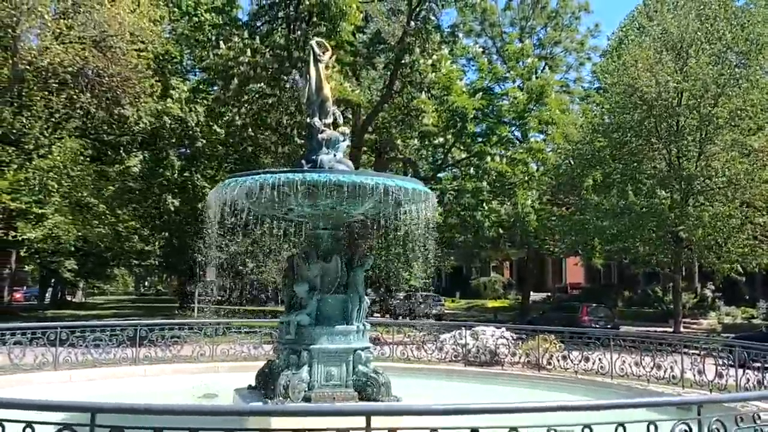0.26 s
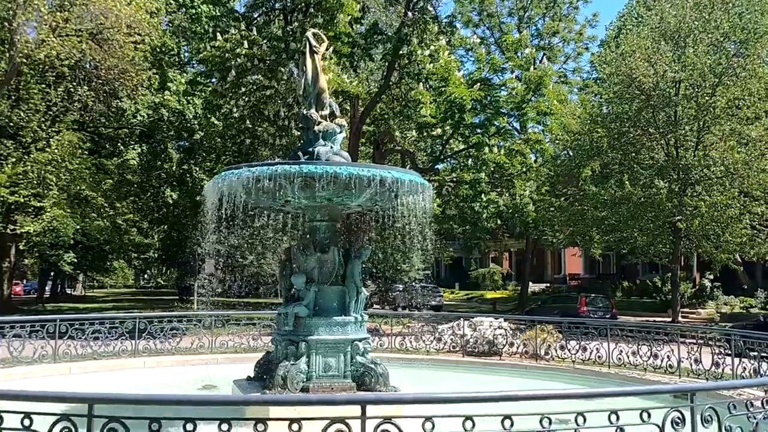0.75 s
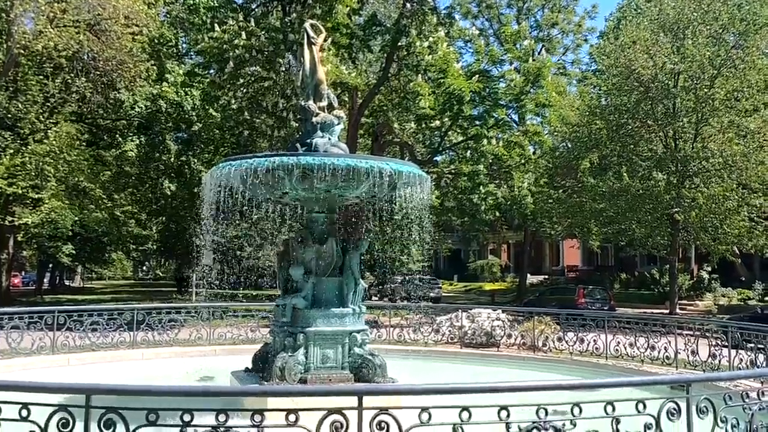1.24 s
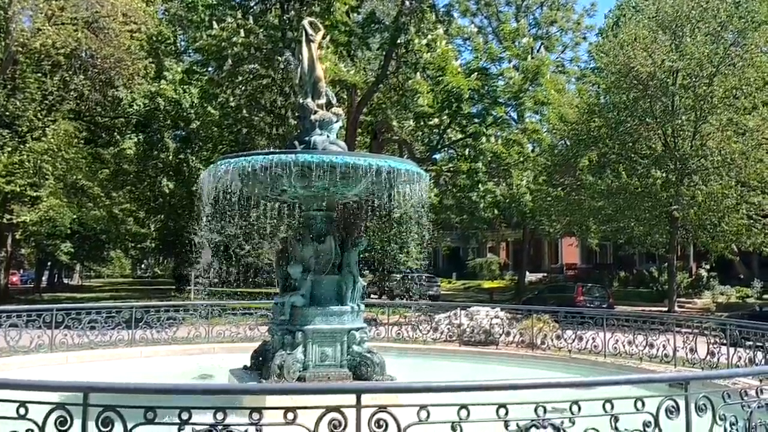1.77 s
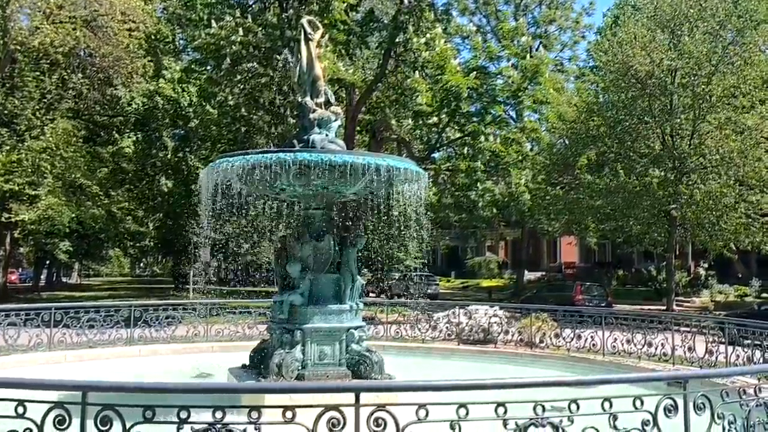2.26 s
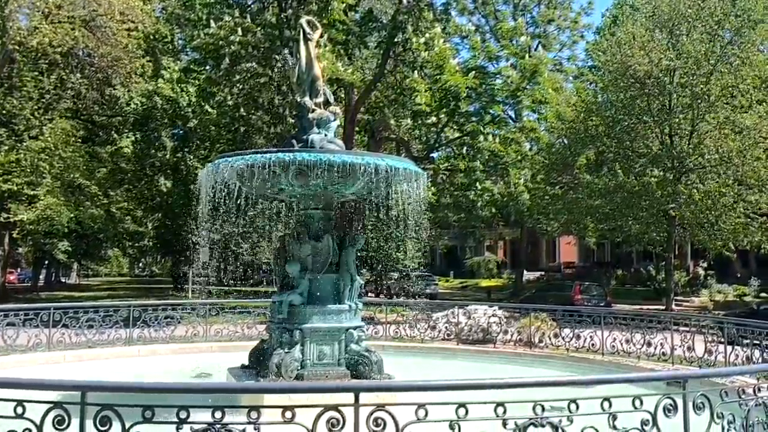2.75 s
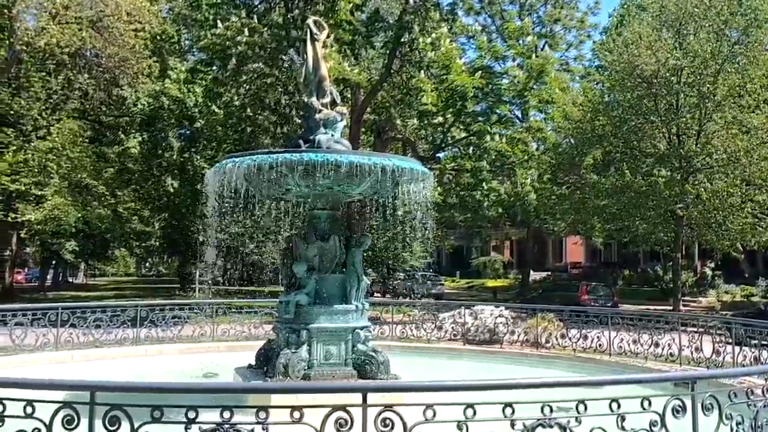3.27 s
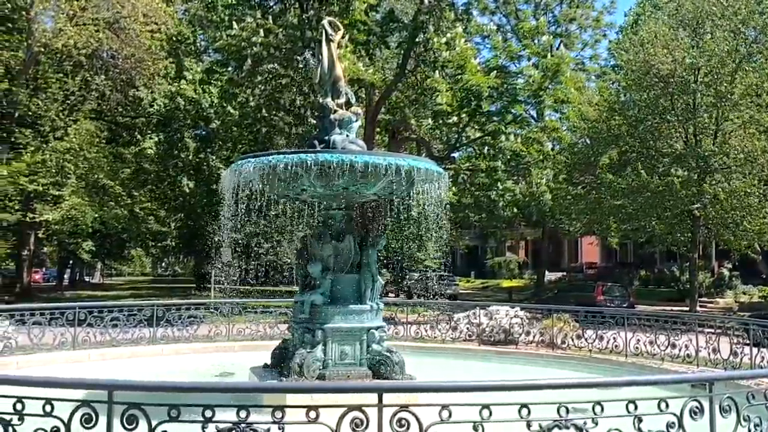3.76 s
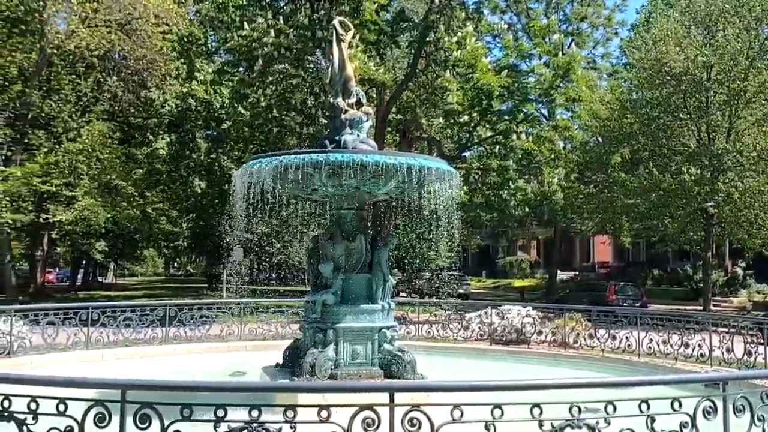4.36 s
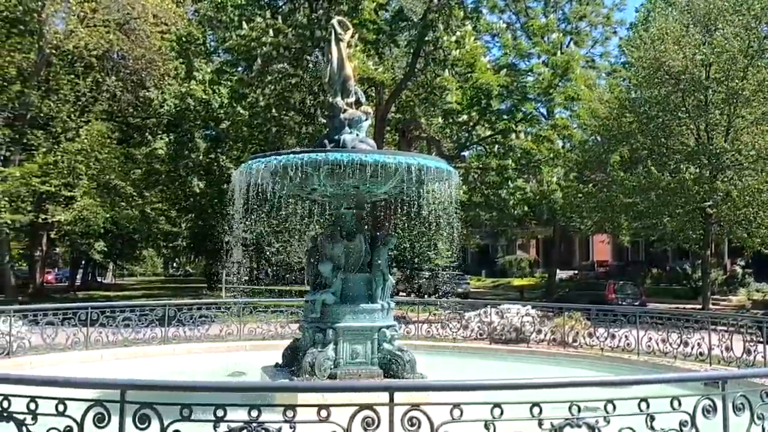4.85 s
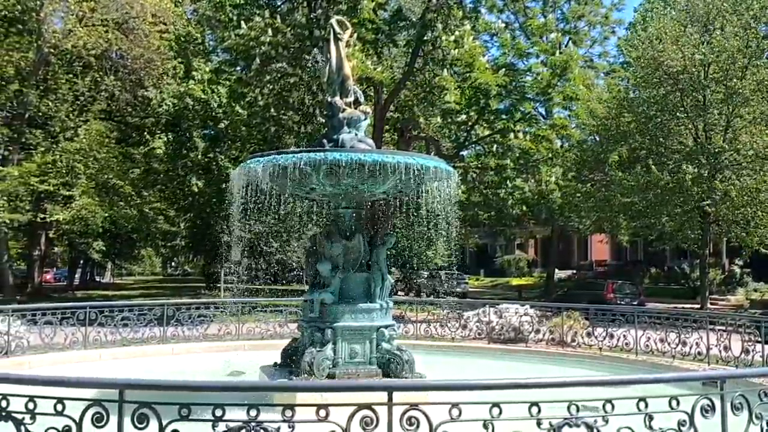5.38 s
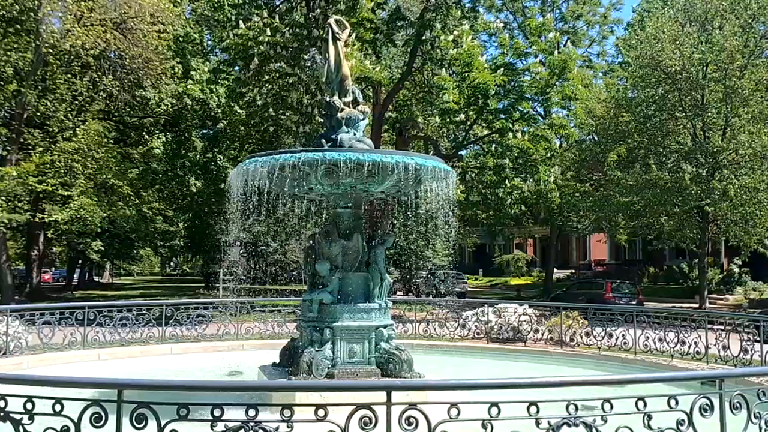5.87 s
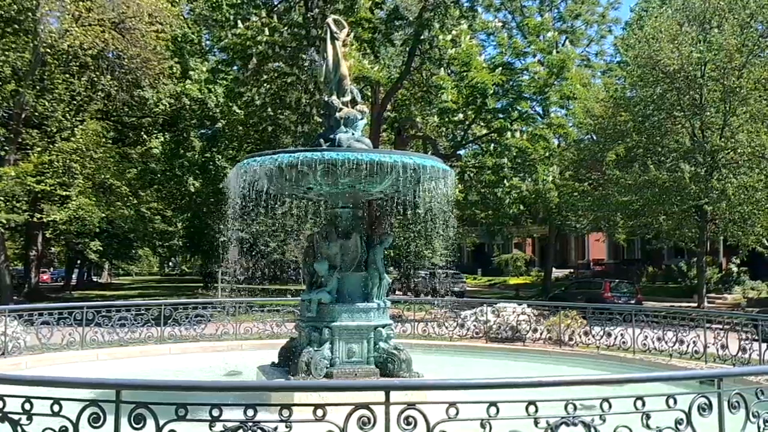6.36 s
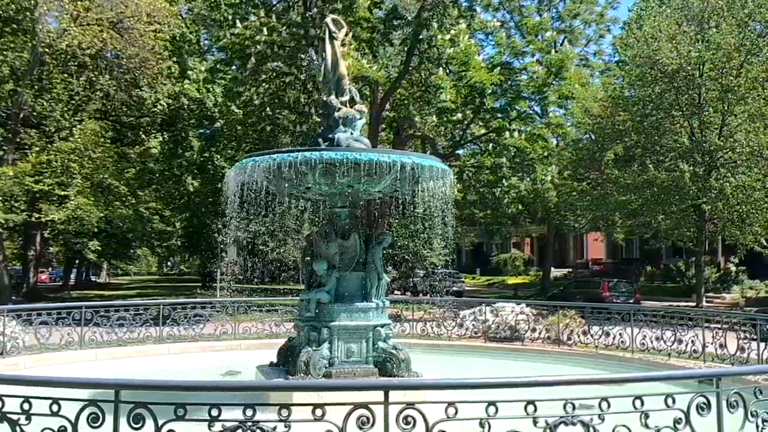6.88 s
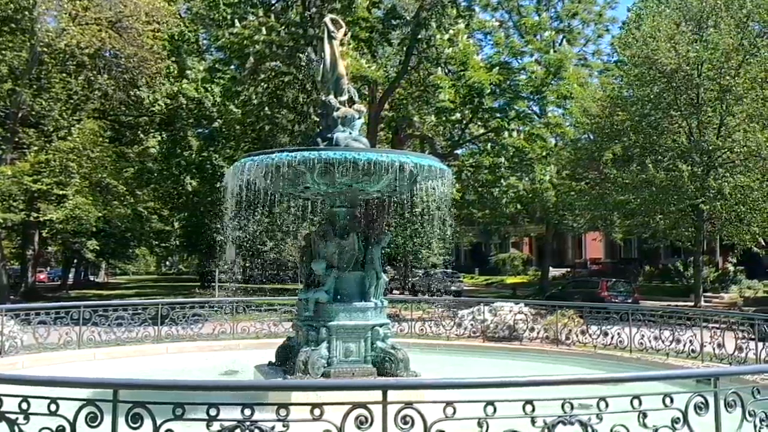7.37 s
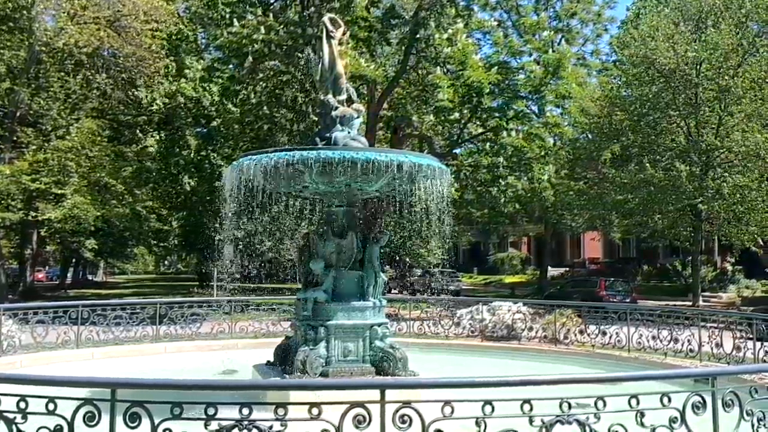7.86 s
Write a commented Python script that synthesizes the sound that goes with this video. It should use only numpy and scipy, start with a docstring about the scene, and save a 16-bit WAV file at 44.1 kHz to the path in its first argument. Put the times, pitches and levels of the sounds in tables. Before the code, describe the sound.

A steady curtain of water falls from a fountain bowl into a shallow pool outdoors, heard from a few metres away in stereo. It runs throughout as quick bubbly patter with a bright fizz of droplets, uneven runs of deeper plops and clear ringing plinks, the strongest near 5.1 s; splashes are sparser from about 6.7 to 8 s. Small dry ticks sound close by at 0.05, 0.2 and 0.9 s. A low, wavering distant engine hum makes one long swell from about 1.7 to 3.3 s, with fainter ones elsewhere over soft rumble and wash. Low wind bumps touch the microphone near 3.0 and 3.2 s. A thin raspy hiss on the left grows, climbing and widening from 3.8 to 4.5 s, then holds until the end at 8.1 s, spitting near 7.1 s. Very faint hoarse hoots fall in pitch far away near 3.8, 7.4 and 7.7 s.

```python
"""Outdoors, a curtain of water falls from a fountain's bowl into its pool. Bubbles make a steady patter and
droplet ticks a fizz; thick strands plop, clumps splash as big ringing bubbles and gusts of spray sweep by.
A distant engine's wavering tone hums in swells, one of them long, over rumble, a low wash and a faint breeze.
A rasping noise band hisses on the left, grows louder and higher halfway through and then stays.
A few dry ticks and thumps sound close by, and far-off wavering tones hoot and fall in pitch."""
import sys
import numpy as np
from scipy import signal
from scipy.fft import rfft, irfft, next_fast_len
from scipy.io import wavfile
from scipy.ndimage import uniform_filter1d

SR = 44100
rng = np.random.default_rng(int(sys.argv[2]) if len(sys.argv) > 2 else 0)


def bounce(signal):
    """Save signal as a 16-bit WAV file at the path given by the first command-line argument."""
    frames = np.transpose(np.atleast_2d(signal))
    limited = np.clip(frames, -1, 1)
    pcm = np.round(limited * 32767).astype(np.int16)
    wavfile.write(sys.argv[1], SR, pcm)


N = 358515
TIME = np.arange(N) / SR

# Clumps of water that splash. Each row: start in seconds, relative level of the big bubble in dB, its pitch in Hz,
# relative level of its shower of drops in dB, left-right difference of the big bubble in dB (positive is left).
SPLASHES = [(.03, -36, 1960, -41, 0), (0.226, -31, 1200, -40, 2), (.2995, -16, 2560, -41, -1),
            (.45, -29, 2670, -36, 0), (.6698, -24, 1990, -40, 0), (.691, -25, 690, -53, 0),
            (0.729, -15.5, 1480, -47, 7), (0.8953, -15.5, 1340, -48, 0), (0.921, -13, 1380, -44, 0),
            (1.01, -28, 2040, -34, 0), (1.31, -25, 2060, -38, 0), (1.5984, -22, 1890, -36, -4),
            (1.7267, -12, 2480, -42, 4), (1.758, -23, 2630, -41, 0), (1.8393, -21, 1370, -35.5, 0),
            (1.896, -16, 2600, -38, 0), (2.249, -18, 1370, -35.5, 2), (2.451, -21, 1310, -38, 0),
            (2.564, -16, 2550, -43, 2), (2.813, -24, 697, -50, 0), (2.9853, -18, 1350, -51, -1),
            (3.112, -22, 2110, -45, 0), (3.1475, -15, 2070, -39, 3), (3.35, -18, 1310, -43, -2),
            (3.529, -17, 1260, -46, 0), (3.565, -25, 1290, -51, 0), (3.9266, -16, 1220, -45, 0),
            (3.936, -23, 930, -45, 2), (4.11, -27, 1340, -38, 0), (4.3632, -12, 2060, -41, 2),
            (4.375, -26, 2660, -32, 0), (4.385, -19, 1370, -34, 0), (4.555, -18, 1370, -38, 0),
            (4.598, -16, 1440, -41, -1), (4.702, -17, 2050, -51, -1), (4.775, -20.5, 687, -59, 0),
            (4.989, -24, 1330, -36, -2), (5.01, -28, 2650, -39, 0), (5.029, -18.5, 826, -54, 0),
            (5.075, -7.5, 2020, -31.5, 0), (5.17, -25, 2000, -40, 0), (5.291, -16.5, 1246, -46, -2),
            (5.4636, -21, 1840, -40, 1), (5.52, -25, 1320, -44, 0), (5.6752, -16, 1220, -40, 5),
            (5.746, -21, 1350, -43, -1), (5.93, -16, 2860, -33, 0), (6.4555, -15.5, 1290, -45, 1),
            (6.503, -23, 2060, -38, 0), (6.6684, -14.5, 1310, -39, 0), (6.7195, -16.5, 1194, -62, 0),
            (7.70, -29, 1300, -35, 0), (7.72, -30, 2020, -36.5, 0), (8.043, -18.5, 1430, -41, 0),
            (8.05, -30, 2470, -31, 0)]
# Spectrum of the low rumble and of the breeze. Each row: frequency in Hz, relative level in dB.
RUMBLE_COLOUR = [(20, -27), (45, -11), (70, -6), (95, 3), (130, -3.5), (180, -3.5), (230, -11), (400, -52)]


def amp(db):
    """Decibels to gain."""
    return 10 ** (np.asarray(db) / 20)


def unit(x):
    """Scales to rms 1."""
    return x / np.sqrt(np.mean(x ** 2) + 1e-20)


def read(points, hz):
    """A spectrum's value on a log-frequency axis."""
    f, value = np.transpose(points)
    return np.interp(np.log(hz + 1e-6), np.log(f), value)


def curves(rows, t=TIME):
    """Each column of a table as a curve in time."""
    s, *columns = np.transpose(rows)
    return [np.interp(t, s, c) for c in columns]


def add(mix, s, sound):
    """Mixes a stereo sound in at time s, in seconds."""
    part = mix[:, max(round(s * SR), 0):][:, :sound.shape[1]]
    part += sound[:, :part.shape[1]]


def pan(side_db):
    """Left and right gains for a level difference; positive leans left."""
    return amp(np.array([[.5], [-.5]]) * side_db)


def colour(x, points):
    """Filters by a spectrum and scales to rms 1."""
    size = next_fast_len(N + 4096)
    gain = amp(read(points, np.fft.rfftfreq(size, 1 / SR)))
    return unit(irfft(rfft(x, size) * gain, size)[:, :N])


def diffuse(pair):
    """Sound from all around: alike in both channels in the bass, unrelated in the treble."""
    # Likeness of the two channels. Each row: frequency in Hz, left-right likeness from 0 to 1.
    likeness = [(60, 0.95), (170, 0.92), (740, 1), (1300, 0.87), (2000, 1), (3300, 0.41), (5500, 0)]
    size = next_fast_len(pair.shape[1])
    a, b = rfft(pair, size)
    same = np.clip(read(likeness, np.fft.rfftfreq(size, 1 / SR)), 0, 1)
    right = same * a + np.sqrt(1 - same ** 2) * b
    return irfft(np.array([a, right]), size)[:, :pair.shape[1]]


def wander(per_s):
    """A random curve of rms 1, drawn in straight lines between per_s random points a second."""
    knots = rng.standard_normal(20000)
    return unit(np.interp(TIME * per_s, np.arange(len(knots)), knots))


def steady(x, size=3000):
    """Keeps the fast grain of a sound and evens out its slow level; size is the averaging span in samples."""
    power = uniform_filter1d(uniform_filter1d((x ** 2).mean(0), size), size)
    return x / np.sqrt(abs(power) + 1e-9)


def patchy(x, depth_db, frames, bins):
    """Narrow bands of a sound brighten and dim at random for a moment."""
    z = signal.stft(x, SR, nperseg=512, noverlap=256)[2]
    smooth_in_time = uniform_filter1d(rng.standard_normal(z.shape), frames, 2)
    patches = unit(uniform_filter1d(smooth_in_time, bins, 1))
    return signal.istft(z * amp(depth_db * patches), SR, nperseg=512, noverlap=256)[1][:, :N]


def tone(hz, db, waver, per_s=25):
    """A sine of rms level db whose pitch wavers by the fraction waver (rms)."""
    phase = 2 * np.pi * np.cumsum(hz * (1 + waver * wander(per_s))) / SR
    return amp(db) * np.sqrt(2) * np.sin(phase)


def scatter(x, wet_db, t60):
    """Scattered echoes from stone, water and trees, changing as the paths shift; t60 is in seconds."""
    t, out = np.arange(SR // 3) / SR, x.copy()
    for k in range(3):
        tail = diffuse(rng.standard_normal((2, len(t)))) * amp(-60 * t / t60) * (t > .003)
        tail = tail / np.linalg.norm(tail[0])
        # three noise tails take turns, 2.3 cycles per second
        share = np.sqrt(2 / 3) * np.cos(2 * np.pi * (2.3 * TIME + k / 3))
        out += amp(wet_db) * signal.oaconvolve(x * share, tail, axes=1)[:, :N]
    return out


def reflect(x):
    """The pedestal's early echo ripples the spectrum, slightly differently at each ear."""
    # The echo off the pedestal: delay in seconds, gain.
    echo = (.00146, 0.28)
    delay_s, gain = echo
    out = x.copy()
    add(out, delay_s, gain * np.array([x[0], np.roll(x[1], 1)]))
    return out


def placed(x):
    """Tilts each frequency of the water to the left or right."""
    # Where the water sits. Each row: frequency in Hz, left-right difference in dB (positive is left).
    water_side = [(400, 2), (800, -1), (1100, 2.5), (1330, -1.5), (1600, -1.5), (1920, -3.5), (2650, -0.5),
                  (2950, -1.5), (4200, -4.5), (4900, 0), (5500, 1.5), (6600, 3.5), (11000, 3), (13800, 8.5)]
    size = next_fast_len(N)
    gains = pan(read(water_side, np.fft.rfftfreq(size, 1 / SR)))
    return irfft(rfft(x, size) * gains, size)[:, :N]


def lumps(events, rise_s, fall_s):
    """Power that builds up and dies away around each (seconds, dB) event."""
    t = TIME[::64]
    power = sum(amp(db) ** 2 * np.exp(-((t - s) / np.where(t < s, rise_s, fall_s)) ** 2) for s, db in events)
    return np.interp(TIME, t, power)


def fall(bed, power=0):
    """Gain of a water layer: its uneven bed follows the falling curtain, and the power of lumps adds to it."""
    # Strength of the falling curtain. Each row: time in seconds, level change in dB.
    flow = [(0.0, 1.5), (1.3, 1.5), (2.6, 1.5), (3.7, 1), (4.3, 0.5), (5.1, 1.5), (5.7, 1), (6.1, 0.5),
            (6.9, 0), (7.5, 0.5), (8.13, 1.5)]
    # Brief changes of the curtain, mostly thinnings. Each row: time in seconds, level change in dB.
    lulls = [(.85, -1), (1.16, -2), (1.68, -1.5), (2.72, -0.5), (4.26, 0), (4.48, -1.5), (6.222, 1),
             (6.95, 0)]
    lull_s = 0.033
    db, uneven_db, per_s = bed
    lull_db = sum(depth * np.exp(-((TIME - s) / lull_s) ** 2) for s, depth in lulls)
    bed_gain = amp(db + curves(flow)[0] + lull_db + uneven_db * wander(per_s))
    return np.sqrt(bed_gain ** 2 + power)


def showers(x, events, octaves, rise_s, fall_s):
    """Around each (s, dB, Hz), drops of one size land thickly: that band of x builds up and thins out."""
    out = np.zeros((2, N))
    for s, db, hz in events:
        near = slice(max(round(s * SR) - SR // 5, 0), round(s * SR) + SR // 5)
        t = TIME[near] - s
        edges = hz * 2 ** (np.array([-.5, .5]) * octaves)
        band = signal.sosfilt(signal.butter(2, edges, "band", fs=SR, output="sos"), x[:, near])
        out[:, near] += amp(db) * unit(band) * np.exp(-.5 * (t / np.where(t < 0, rise_s, fall_s)) ** 2)
    return out


def bubble(hz, cycles, place, onset, rise=0.041, spread_s=.00007, softness=2):
    """A trapped air pocket swells, rings and rises in pitch; its place sets the delay between the ears."""
    t = np.arange(int(7 * cycles / hz * SR)) / SR
    # age counts cycles since the sound reached each ear
    age = np.maximum(t - spread_s * (1 + np.array([[place], [-place]])), 0) * hz
    ring = np.exp(-age / cycles) * (1 - np.exp(-age / (onset * cycles))) ** softness
    return np.sin(2 * np.pi * age * (1 + rise * age / cycles / 2)) * ring / (ring.max() + 1e-9)


def bubbles(low_hz, high_hz, cycles, spread_db, count):
    """Bubbles at random times and places, many small and a few large."""
    out = np.zeros((2, N))
    for when, pitch, size, ring, place in rng.random((count, 5)):
        db = spread_db * min(-np.log(1 - size), 4)
        hz = low_hz + pitch * (high_hz - low_hz)
        one = bubble(hz, cycles * (.5 + ring), 2 * place - 1, onset=1.5, softness=3.25)
        add(out, when * N / SR, amp(db) * one)
    return out


def pool(shower_db=-2.0, shower_lag_s=0.017):
    """Thick strands of water plop, thin ones patter; around each splash the patter thickens at its pitch."""
    # Thick strands break off the rim and land as runs of deep plops. Each row: time in seconds, level in dB.
    strands = [(.06, -43), (.42, -42), (.7, -45), (.95, -57), (1.28, -42.5), (1.39, -45.5), (1.63, -38.5),
               (1.97, -41.5), (2.32, -38.5), (2.51, -45), (2.83, -57), (3.04, -49), (3.28, -42),
               (3.61, -42.5), (3.8, -44), (3.94, -41.5), (4.1, -45), (4.76, -38), (4.88, -43), (5.02, -47),
               (5.31, -41.5), (5.47, -45.5), (5.69, -45), (5.82, -42), (6.41, -45), (7.02, -48),
               (7.14, -45), (7.4, -44), (7.64, -42), (7.96, -44)]
    # The steady beds: level in dB, unevenness in dB, changes per second.
    plop_bed = (-48.5, 1.35, 7)
    patter_bed = (-39, 0.67, 9.9)
    # Spectra of plops and patter. Each row: frequency in Hz, relative level in dB.
    plop_colour = [(200, -24), (400, -11.5), (520, -10), (670, -3.5), (890, -2.5), (1020, -10.5),
                   (1250, -32)]
    patter_colour = [(800, -23), (1030, -9), (1170, -2.5), (1290, 3), (1430, -2), (1670, -9), (1880, 0),
                     (2100, 3), (2310, -3.5), (2560, -0.5), (2900, -6.5), (3200, -5), (4500, -39)]

    plops = bubbles(440.0, 1098, cycles=2.17, spread_db=4.0, count=2200)
    plops = steady(colour(scatter(plops, wet_db=-3.0, t60=0.2), plop_colour))
    plop_gain = fall(plop_bed, lumps(strands, rise_s=0.05, fall_s=0.06))

    patter = bubbles(1020, 3366, cycles=2.54, spread_db=4.5, count=7500)
    patter = steady(colour(scatter(patter, wet_db=-0.5, t60=0.27), patter_colour))
    patter_layer = fall(patter_bed) * patchy(patter, depth_db=1.74, frames=6, bins=19)
    bursts = [(s + shower_lag_s, db + shower_db, hz) for s, _, hz, db, _ in SPLASHES]
    thickenings = showers(patter, bursts, octaves=0.59, rise_s=0.024, fall_s=0.029)
    return plop_gain * plops + patter_layer + thickenings


def spray(grain_db=0.5, drops_per_s=5000, flicker_db=.5):
    """Thousands of droplets tick on the surface and merge into a fizz; each gust carries droplets of one size."""
    # Gusts of fine spray. Each row: time in seconds, level in dB, centre in Hz.
    gusts = [(.04, -44, 4330), (.17, -34, 4440), (.32, -34, 4700), (.32, -40, 8200), (.59, -33, 4500),
             (.6, -40, 7860), (1.78, -50, 6400), (2.23, -54, 6000), (2.57, -43, 4220), (2.6, -37, 6300),
             (3.06, -39, 4970), (3.38, -47, 4300), (3.53, -43, 4340), (3.75, -45, 4470), (5.07, -40, 3760),
             (5.3, -58, 5500), (7.18, -48, 9500), (7.83, -34, 4250)]
    # The steady fizz: relative level in dB, unevenness in dB, changes per second.
    spray_bed = (-40, 1, 11)
    # Spectrum of the fizz. Each row: frequency in Hz, relative level in dB.
    spray_colour = [(300, -22), (1300, -1), (2600, -1), (3150, -3), (3450, 0), (3750, -0.5), (4200, 0),
                    (4900, -2), (5400, -2), (5950, 0.5), (6550, 6.5), (6900, 6.5), (7300, 2.5),
                    (9400, -1.5), (10800, -5), (12000, -12.5), (13000, -10.5), (14200, -8), (15700, -12.5)]
    landings = rng.random((2, N)) < drops_per_s / SR
    strengths = amp(grain_db * np.minimum(rng.exponential(1, (2, N)), 5))
    droplets = strengths * landings * rng.standard_normal((2, N))
    fizz = diffuse(droplets) * amp(flicker_db * wander(70))
    fizz = colour(patchy(reflect(fizz), depth_db=4.5, frames=4, bins=3), spray_colour)
    sweeps = showers(fizz, gusts, octaves=1.0, rise_s=0.043, fall_s=0.031)
    return amp(7.5) * fall(spray_bed) * fizz + sweeps


def hiss(flutter_db=0.8, sputter_db=0.5, rasp_hz=215, spit_s=0.0009):
    """A rasping, spitting band of noise on the left that climbs in pitch and widens as it gains strength."""
    # Course of the hiss. Each row: time in seconds, relative level in dB, peak in Hz,
    # openness from 0 (narrow) to 1 (wide).
    course = [(0, -54, 6370, .3), (.16, -32.5, 6700, 0.025), (.33, -27, 7040, 0), (.46, -31.5, 6960, 0),
              (.75, -42, 5900, 0.41), (.88, -37.5, 6600, 0.54), (.95, -33, 6900, 0.024),
              (1.17, -33.5, 6960, 0), (1.29, -28.5, 7140, 0.47), (1.49, -29, 7060, 0.045),
              (1.59, -24.5, 7430, 0.6), (1.76, -29, 7100, 0.063), (2.62, -25.5, 7170, 0.075),
              (3.05, -28.5, 7150, 0.064), (3.55, -26.5, 7210, 0.14), (3.75, -28.5, 7150, 0.1),
              (3.86, -25, 7400, .45), (4.1, -21, 7740, 0.7), (4.25, -19, 7920, 0.57),
              (4.34, -17.5, 8170, 0.77), (4.45, -17.5, 8500, 1), (4.6, -18, 8630, 1),
              (5.3, -17.5, 8640, 0.86), (6.5, -18, 8840, 0.79), (8.13, -17.5, 8850, 0.84)]
    # Shape of the band, a peak with a shoulder above it. Each row: multiple of the peak frequency,
    # relative level in dB when narrow, relative level in dB when wide.
    band_shape = [(.5, -70, -70), (.7, -44, -58), (.79, -15, -52), (.84, -12, -12.5), (.9, -3.5, -5),
                  (1, 2.5, -0.5), (1.08, -0.5, -1), (1.18, -7.5, -3), (1.28, -10, -1), (1.42, -10.5, -9),
                  (1.53, -14.5, -12), (1.63, -31, -23), (1.8, -55, -35)]
    # Spits. Each row: time in seconds, dB above the level of the hiss.
    spit_rows = [(2.1372, 12), (2.478, 4), (2.498, 6), (3.036, 12), (4.305, 3), (7.126, 5.5),
                 (7.1414, 12.5), (7.171, 10.5)]

    hz, t, z = signal.stft(rng.standard_normal(N), SR, nperseg=512, noverlap=384)
    _, peak_hz, openness = curves(course, t)
    ratio = np.maximum(hz[:, None] / peak_hz, 1e-3)
    narrow = read([(multiple, db) for multiple, db, _ in band_shape], ratio)
    wide = read([(multiple, db) for multiple, _, db in band_shape], ratio)
    gain = amp(narrow + openness * (wide - narrow))
    gain = gain / np.linalg.norm(gain, axis=0)
    band = unit(signal.istft(z * gain, nperseg=512, noverlap=384)[1][:N])

    # the rasp is a wave of level in dB, about 0.4 dB rms
    rasp = tone(rasp_hz, -8.0, waver=0.23, per_s=160)
    sizzle = band * amp(flutter_db * wander(80) + sputter_db * wander(600) + rasp)
    left_only = np.array([sizzle, np.zeros(N)])
    sizzle = steady(patchy(left_only, depth_db=1.53, frames=14, bins=2))
    spits = sum(db * np.exp(-((TIME - s) / spit_s) ** 2) for s, db in spit_rows)
    return sizzle * amp(curves(course)[0] + 3.5 + spits)


def swell(start, length, skew=0.77, point=1.4):
    """One arch of level, from silence to 1 and back; it tops out early and a higher point sharpens it."""
    u = np.clip((TIME - start) / length, 0, 1)
    return abs(np.sin(np.pi * u ** skew)) ** point


def distance(hum_hz=144.1, hum_rest_db=-57.5, rough_db=1.3, air_uneven_db=1.8):
    """The engine's hum and rumble swell together over the low wash of the park."""
    # The hum drifts in and out. Each row: start in seconds, length in seconds, relative top level in dB.
    hum_swells = [(-.12, 0.64, -48.5), (.99, 0.3, -46), (1.72, 1.56, -31.5), (2.93, 0.41, -48),
                  (3.968, 0.32, -53), (4.835, 0.48, -52), (5.318, 0.62, -47), (6.092, 0.45, -44),
                  (6.3, 0.96, -60), (7.854, 0.47, -44.5)]
    # Fainter tones at the top of the long swell. Each row: start in seconds, length in seconds,
    # pitch in Hz, top level in dB.
    overtone_rows = [(2.32, 0.54, 337, -49), (2.25, 0.73, 288, -54.5)]
    # The rumble under the hum: resting level in dB, level in dB relative to the hum's gain curve.
    rumble_levels = (-57, -14.5)
    # The low wash of the park. Each row: time in seconds, level in dB.
    air_course = [(0, -48), (.5, -58.5), (.9, -60), (1.45, -52), (2.1, -55.5), (2.55, -46), (2.92, -57),
                  (3.12, -45.5), (3.4, -58), (3.68, -48), (3.76, -42), (3.9, -46.5), (4.15, -48),
                  (4.5, -48.5), (5, -53.5), (6.4, -50.5), (6.9, -55.5), (7.27, -53), (7.38, -45),
                  (7.65, -48.5), (7.9, -56), (8.13, -48)]
    # Spectrum of the wash. Each row: frequency in Hz, relative level in dB.
    air_colour = [(30, -7), (120, -7), (200, -6.5), (280, 4), (400, 0), (700, -3), (2000, -15.5)]

    hum_gain = amp(hum_rest_db) + sum(amp(db) * swell(s, length) for s, length, db in hum_swells)
    hum = hum_gain * amp(rough_db * wander(60)) * tone(hum_hz, db=-3.5, waver=0.0032)
    overtones = sum(swell(s, length) * tone(hz, db, waver=0.0243, per_s=63)
                    for s, length, hz, db in overtone_rows)

    rest_db, follow_db = rumble_levels
    rumble_gain = np.hypot(amp(rest_db), amp(follow_db) * hum_gain)
    rumble = rumble_gain * colour(diffuse(rng.standard_normal((2, N))), RUMBLE_COLOUR)
    air_gain = amp(curves(air_course)[0] + air_uneven_db * wander(12))
    air = air_gain * colour(diffuse(rng.standard_normal((2, N))), air_colour)
    return hum + overtones + rumble * pan(-2.5) + air * pan(0.82)


def breeze(rest_db=-74, uneven_db=3):
    """A faint uneven breeze and its short low buffets, unrelated at the two ears and stronger on the right."""
    # Soft buffets on the microphone. Each row: time in seconds, level in dB.
    buffets = [(.08, -52), (2.58, -62), (3.0, -45), (3.17, -44.5), (5.65, -55), (6.27, -61), (6.65, -59)]
    rest = amp(rest_db + uneven_db * wander(4.6))
    gain = np.sqrt(rest ** 2 + lumps(buffets, rise_s=0.075, fall_s=0.07))
    return gain * pan(-6.5) * colour(rng.standard_normal((2, N)), RUMBLE_COLOUR)


def splashes(drops_db=0.5, pitch_spread=0.072, count=8, shower_s=.08):
    """A clump makes one big bubble, then its largest thrown drops fall back and ring near the same pitch."""
    out = np.zeros((2, N))
    for s, db, hz, shower_db, side_db in SPLASHES:
        place = rng.random() - .5
        add(out, s, amp(db - 8.5) * pan(side_db) * bubble(hz, 7.0, place, onset=0.069))
        # the drops fall back within shower_s seconds
        lags = shower_s * rng.random(count) ** 1.2
        for late, pitch in zip(lags, rng.standard_normal(count)):
            drop = bubble(hz * np.exp(pitch_spread * pitch), 2.6, place, onset=0.26)
            add(out, s + late, amp(shower_db + drops_db) * drop)
    return scatter(out, wet_db=-5.5, t60=0.28)


def ticks():
    """Dry ticks and thumps: sines under a steep decay that die within a few cycles."""
    # Ticks and low thumps close to the microphone. Each row: start in seconds, relative level in dB,
    # centre in Hz, decay per second, left-right difference in dB (positive is left).
    tick_rows = [(0.0509, -14, 433, 2600, 31.5), (0.168, -19.5, 5740, 1000, 25),
                 (0.896, -18.5, 1760, 800, -3), (3.018, -32, 85, 72, -13), (3.175, -32, 122, 82, -18)]
    out, t = np.zeros((2, N)), np.arange(SR // 8) / SR
    for s, db, hz, decay, side_db in tick_rows:
        shape = np.exp(-decay * t) * (1 - np.exp(-8 * hz * t))
        add(out, s, amp(db) * pan(side_db) * np.cos(2 * np.pi * hz * t) * shape)
    return out


def hoots(sag=0.3, bend=3.06, rough=0.42):
    """Each hoarse hoot swells, holds its pitch and then falls, a little blurred by distance."""
    # Faint hoots far away. Each row: start in seconds, length in seconds, first pitch in Hz, relative level in dB.
    hoot_rows = [(3.709, 0.205, 318, -40), (7.303, 0.26, 333, -53.5), (7.616, 0.24, 266, -49)]
    out = np.zeros((2, N))
    for s, length, hz, db in hoot_rows:
        u = np.clip((TIME - s) / length, 0, 1)
        voice = tone(hz * (1 - sag * u ** bend), db, waver=0.025, per_s=130)
        out += voice * np.sin(np.pi * u) ** 2
    hoarse = (1 + rough * wander(200)) / np.hypot(1, rough)
    return scatter(out * hoarse, wet_db=-9, t60=0.22)


def scene():
    """The fountain in its park."""
    water = placed(pool() + spray() + splashes())
    return water + hiss() + distance() + breeze() + ticks() + hoots()


def record(dry, edge_hz=15750):
    """Full-scale clipping, then a steep low-pass at edge_hz."""
    low_pass = signal.firwin(511, edge_hz, window=("kaiser", 7), fs=SR)
    return signal.oaconvolve(np.clip(dry, -1, 1), low_pass[None], "same")


dry = scene()
out = record(dry)
bounce(out)
```